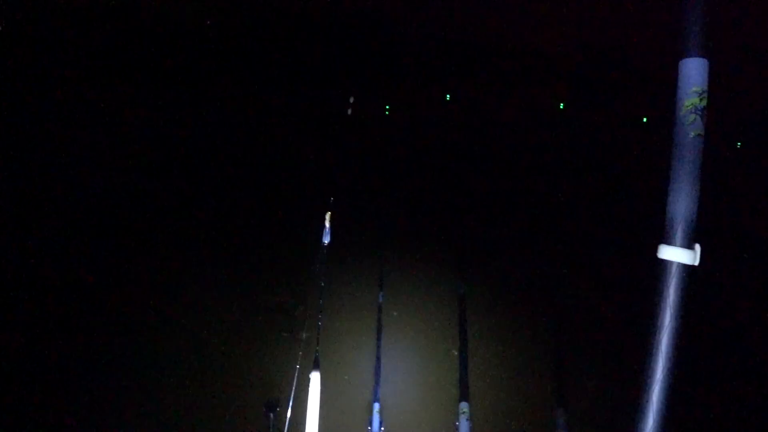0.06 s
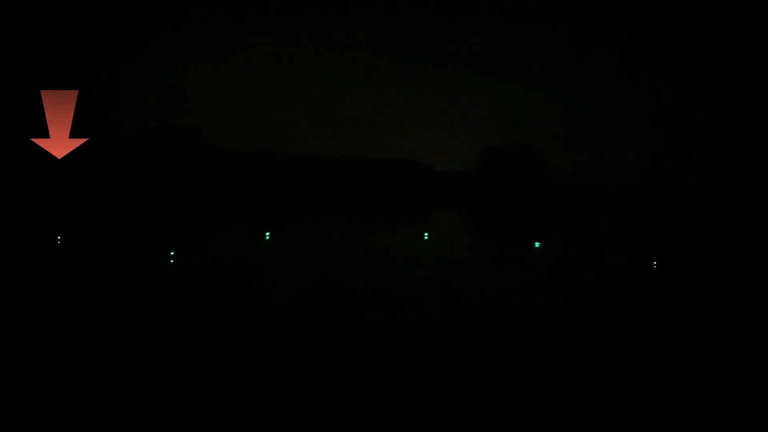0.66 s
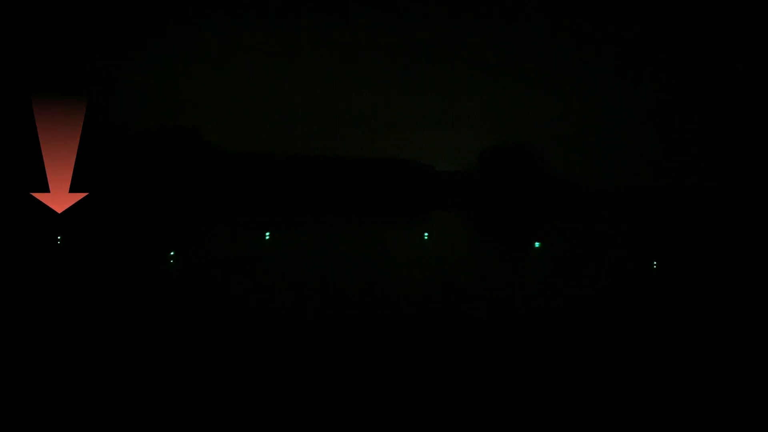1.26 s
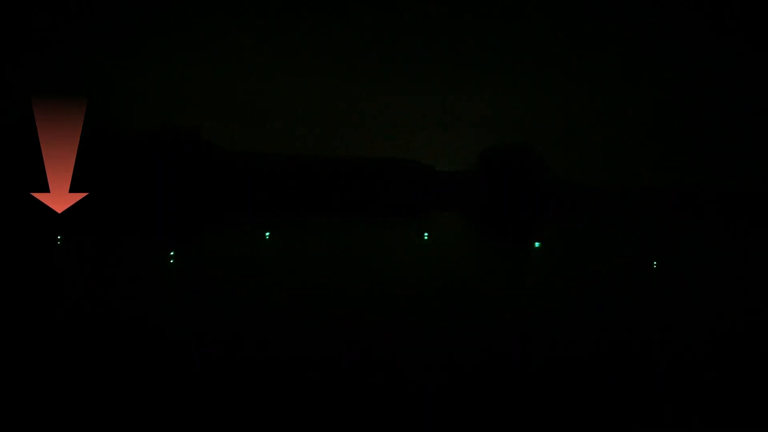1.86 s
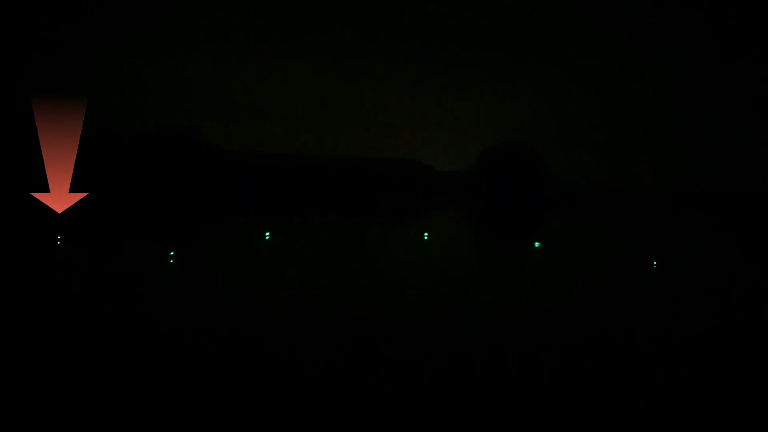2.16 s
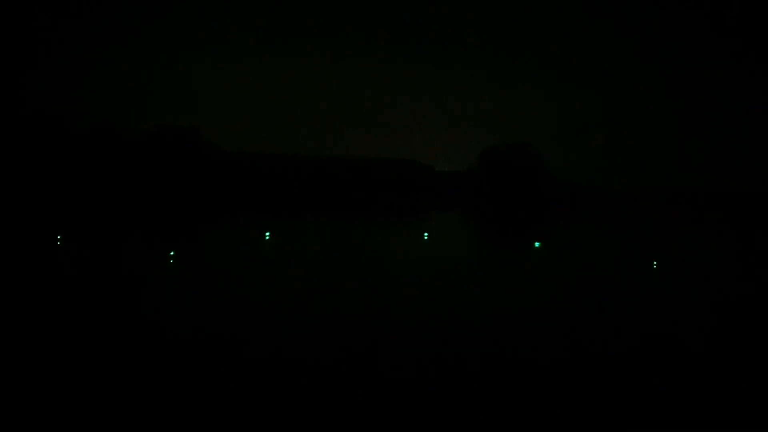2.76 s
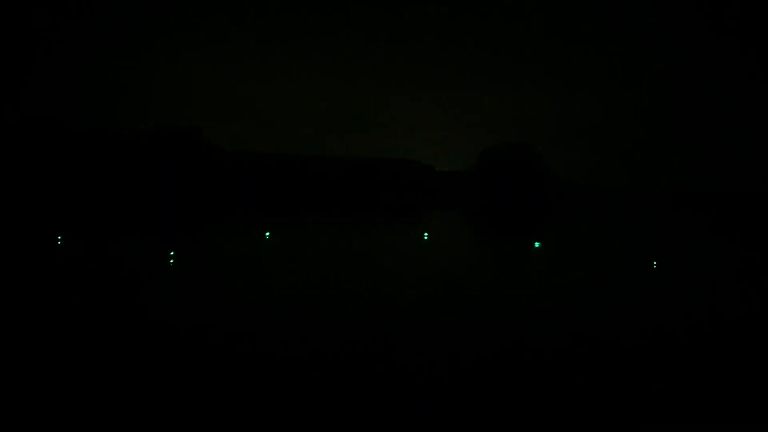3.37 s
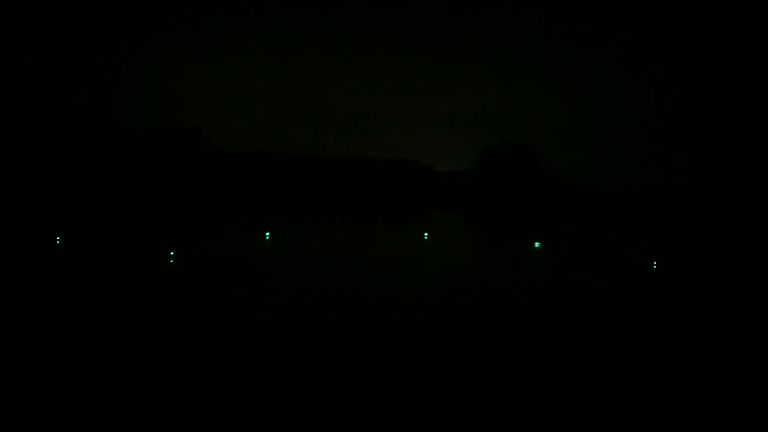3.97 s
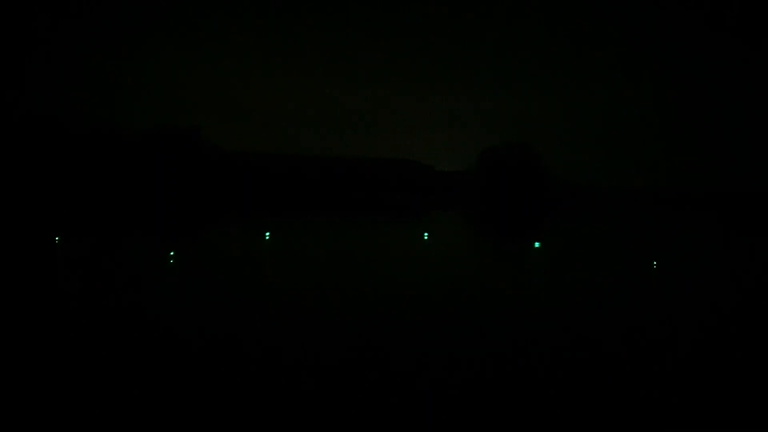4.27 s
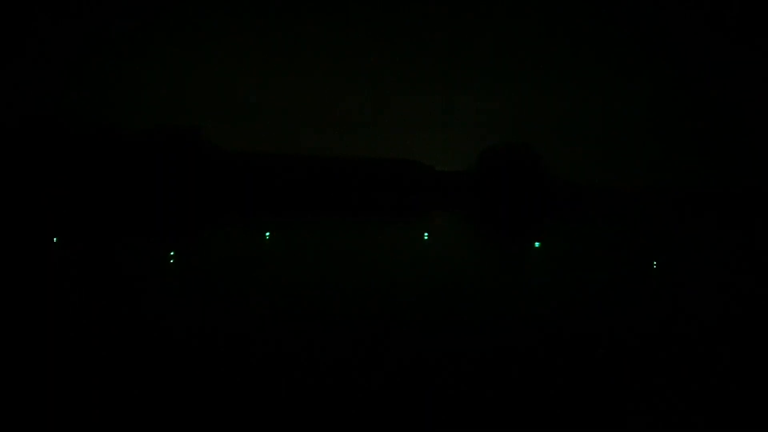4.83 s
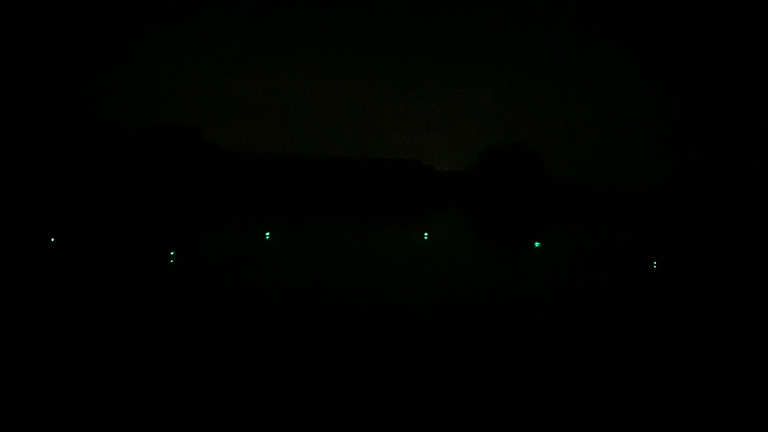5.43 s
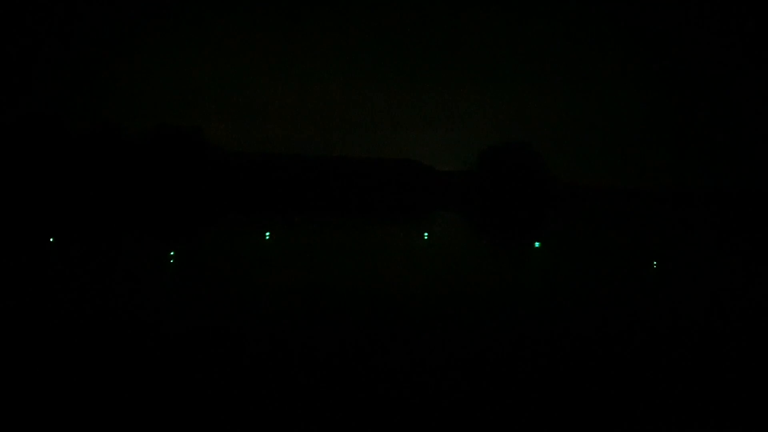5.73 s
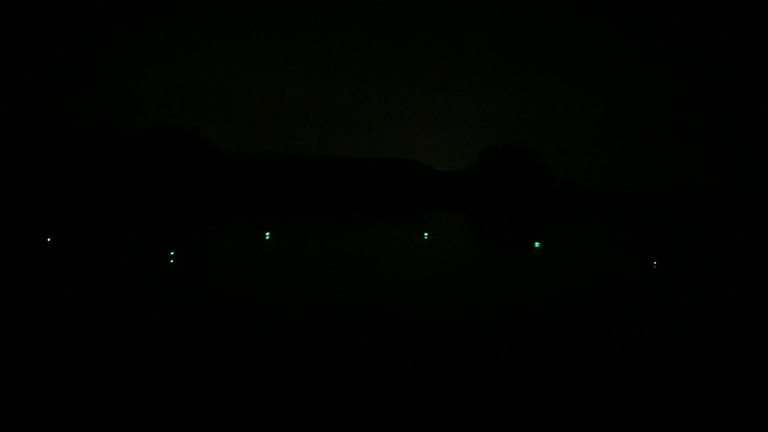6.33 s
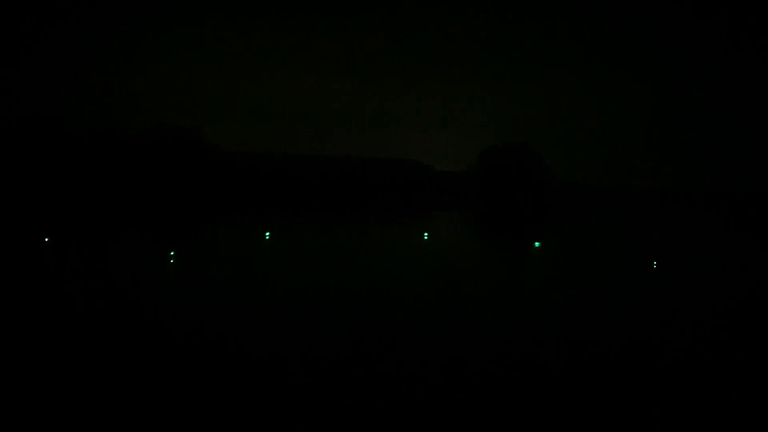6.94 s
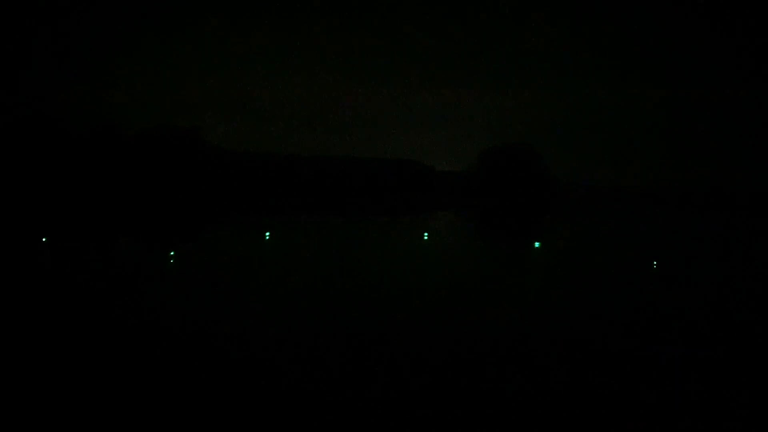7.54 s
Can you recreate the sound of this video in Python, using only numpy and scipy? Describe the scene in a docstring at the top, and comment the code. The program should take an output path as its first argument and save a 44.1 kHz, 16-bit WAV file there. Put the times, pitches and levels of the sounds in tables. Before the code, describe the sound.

A brief hiss gives way to a low, wavering wind rumble on the microphone beneath a night chorus of crickets beside open water. Close crickets pulse in repeated phrases on the left, with thin, fast insect ticking above and a few faint far chirps and soft rustles. Past the middle the wind strengthens and knocks against the microphone in deep thumps, one cracking sharply, as the crickets carry on.

```python
"""Crickets trill in chorus on a reservoir bank at night, by stridulation: each wing stroke scrapes a tone. The
nearest sing in swelling phrases, and a bush-cricket ticks high above them. A brief hiss fills the very start,
and at 0.135 s the sound changes abruptly: turbulent wind rumbles on the two microphone ports, grows, and
buffets them until the left one overloads. Far chirps and faint rustles come and go over the still night air."""
import sys
import numpy as np
from scipy import signal
from scipy.fft import rfft, irfft
from scipy.io import wavfile
from scipy.ndimage import uniform_filter1d

SR = 44100
rng = np.random.default_rng(int(sys.argv[2]) if len(sys.argv) > 2 else 0)


def wav_out(sig):
    """Save sig, one row per channel (or a flat mono array), as 16-bit PCM at SR to the path in sys.argv[1]."""
    wavfile.write(sys.argv[1], SR, np.round(np.clip(np.atleast_2d(sig).T, -1, 1) * 32767).astype(np.int16))


N = 335160
T = np.arange(N) / SR
FREQ = np.arange(N // 2 + 1) * SR / N + 1e-3


def chorus():
    """Incoherent summation: two kinds of cricket trill, and the furthest blur into band noise."""
    # spectra of the low and the high kind: frequency_hz, gain_db
    low_band = [(4300, -24), (4620, -15), (4810, 1), (4960, 1.5), (5140, -2), (5280, -10), (5420, -15),
                (5800, -37.5)]
    high_band = [(5000, -21), (5500, -6.5), (5900, 0), (6300, -0.5), (6600, -6), (6900, -10), (7100, -20),
                 (7600, -37)]
    # the low kind joins in for a moment: centre_s, half_length_s, lift_db
    surges = [(.63, 0.14, 6.5), (5.8, .2, 5), (6.7, 0.72, 2.5)]
    low = colour(swarm(4740, 5300, strokes_per_s=31, droop=.03, spread=.014, t60_s=.22, count=8), low_band)
    low = unit(low + .4 * colour(noise(), low_band))
    low *= undb(-56 + sum(swell(*row) for row in surges))
    high = swarm(5600, 6900, strokes_per_s=50, droop=.054, spread=.03, t60_s=.4, count=5)
    hush = colour(noise() * undb(1.2 * wander(110)), high_band)
    high = unit(colour(high, high_band) + 1.35 * hush)
    high *= undb(-56.5 + swell(centre_s=4, half_length_s=1.4, lift_db=-3))
    return from_left(low, right_db=-12) + from_left(high, right_db=-17)


def swarm(low_hz, high_hz, strokes_per_s, droop, spread, t60_s, count):
    """Superposition: crickets take turns at each pitch, so each stroke has its own tuning and strength."""
    song = 0
    for hz in np.linspace(low_hz, high_hz, count):
        beats = strokes_per_s * rng.uniform(.8, 1.2) * T + rng.random()
        k = beats.astype(int)
        progress = beats - k
        tuning, accent_db = rng.standard_normal((k[-1] + 1, 2)).T
        pitch_hz = hz * (1 - droop * (progress - .5) + spread * tuning[k])
        song += undb(accent_db)[k] * (progress * (1 - progress)) ** 2 * tone(pitch_hz)
    share = np.pi * wander(4)  # nearby grass and the far bank answer in shifting shares
    return scatter(song * np.cos(share), t60_s) + scatter(song * np.sin(share), t60_s)


def near_crickets(droop=.14, stroke_s=.025, lead_s=.012, rise_db_per_s=32, fade_db_per_s=21):
    """Stridulation: each wing closure scrapes a tone whose pitch sags as the wing slows."""
    # phrases: first_stroke_s, last_stroke_s, strokes_per_s, pitch_hz, crest_s, relative_level_db
    phrases = [(0.486, .79, 30.3, 5020, 0.69, -53), (1.719, 2.2, 32, 5220, 1.5, -48),
               (2.403, 2.732, 30.3, 4820, 2.68, -46.5), (2.872, 3.2, 29, 4850, 2.92, -48.5),
               (3.26, 3.677, 29, 5120, 3.45, -49), (3.762, 4.182, 29, 4850, 3.99, -50.5),
               (4.617, 4.946, 30.2, 4885, 4.93, -41.5), (5.091, 5.605, 31.2, 4876, 5.195, -39),
               (5.832, 6.28, 29.3, 4950, 5.88, -49), (6.509, 7.089, 30.5, 4915, 6.64, -43.5),
               (7.246, 7.57, 30.6, 4966, 7.4, -47.5)]
    song = np.zeros(N + SR)
    progress = T[:int(stroke_s * SR)] / stroke_s
    envelope = arch(progress, skew=.8) ** 1.5
    for first_s, last_s, rate, hz, crest_s, level_db in phrases:
        for k in range(round((last_s - first_s) * rate) + 1):
            late, sharp, strong = rng.standard_normal(3)
            time_s = first_s + k / rate
            drop_db = max(rise_db_per_s * (crest_s - time_s), fade_db_per_s * (time_s - crest_s))
            slowness = np.exp(-k / 1.2)  # the first strokes are slower, so flatter and weaker
            pitch_hz = hz * (1 - droop * progress ** 3.17) * (1 + .004 * sharp - .022 * slowness)
            gain = undb(level_db - .76 - drop_db + .6 * strong - 5.5 * slowness)
            start = int((time_s - lead_s + .0007 * late) * SR)
            song[start:start + len(progress)] += gain * envelope * tone(pitch_hz)
    song = song[:N] * undb(1.4 * wander(440))  # the teeth of the wing's file catch unevenly
    return from_left(song + undb(-9) * scatter(song, t60_s=.2), right_db=-12)


def bush_crickets(ticks_per_s=19.325, slowing_per_s2=.1685, first_tick_s=.0244):
    """Broadband stridulation: a rasp on each slowing wing beat, over the sizzle of others further off."""
    # loudness of the near insect: time_s, level_db
    tick_levels = [(.4, -58.5), (1, -63.5), (3.5, -60), (4, -58), (5.9, -57), (6.6, -59.5)]
    # spectra of the near rasp and the far sizzle: frequency_hz, gain_db
    tick_band = [(8000, -41.5), (11200, -18), (12600, -1), (14000, -1), (16000, 2.5)]
    sizzle_band = [(6000, -42.5), (8500, -33), (11000, -13.5), (12000, -5.5), (13300, 5), (15500, 6.5)]
    beats = ticks_per_s * (T - first_tick_s) - slowing_per_s2 * T ** 2 / 2
    offset = (beats + .5) % 1 - .5  # in beats from the nearest tick
    pulse = np.exp(-.5 * (offset / .06) ** 2)
    echo = .24 * (offset > 0) * np.exp(-np.abs(offset) / .2)
    rasp = colour(noise() * (pulse + echo) * undb(2 * wander(900)), tick_band)
    sizzle = colour(noise() * undb(1.5 * wander(150)), sizzle_band)
    flare_db = swell(centre_s=3.36, half_length_s=.2, lift_db=6)
    song = rasp * undb(curves(tick_levels)[0]) + sizzle * undb(-58.5 + flare_db)
    return from_left(song * undb(wander(6)), right_db=-17)


def wind():
    """Turbulence: rumble, hollow drone and whoosh rise with the gusts and waver together."""
    # base strength of the wind: time_s, rumble_db, whoosh_db
    strength = [(.14, -26, -50), (.6, -26.5, -48.5), (.76, -37.5, -57.5), (1.15, -36.5, -60),
                (1.35, -34, -53), (2.1, -38, -54.5), (2.8, -36.5, -52), (3.8, -39, -59),
                (4.38, -35.5, -47.5), (4.55, -29.5, -46.5), (4.95, -29.5, -46.5), (5.25, -24, -50.5),
                (5.55, -26.5, -48), (5.85, -18.5, -45.5), (6.1, -25, -50), (6.62, -28.5, -43.5),
                (6.9, -28.5, -48.5), (7.6, -29.5, -49)]
    # small, hollow-sounding gusts: centre_s, half_length_s, lift_db
    gusts = [(1.403, 0.13, 5), (2.377, 0.2, 4), (2.92, .2, 5.5), (3.465, .15, 9.5), (5.3, 0.27, 7.5),
             (6.255, 0.24, 5.5)]
    # side from which the wind strikes: time_s, left_minus_right_db
    lean = [(4.9, 0.5), (5.35, 1), (5.75, -2), (6.3, 7), (6.58, -4), (6.78, 5.5), (7.4, -3)]
    rumble_db, whoosh_db = curves(strength)
    gust_db = sum(swell(*row) for row in gusts)
    lean_db = curves(lean)[0] * np.array([[.5], [-.5]])
    above_breeze_db = rumble_db + 34.5
    lull_db = swell(centre_s=4.22, half_length_s=.51, lift_db=-8.5)
    flow = port_rumble() * undb(rumble_db + .23 * gust_db + lean_db)
    flow += hollow_drone() * undb(-51.5 + .15 * above_breeze_db + gust_db + lull_db)
    flow += whoosh() * undb(whoosh_db + 1 + .45 * gust_db)
    return flow * undb(1.16 * wander(7.8))


def port_rumble(evenness=.35):
    """Eddy shedding: a light breeze presses both ports alike; a rising one sheds separate eddies at each."""
    # spectra of the common pressure and of each port's eddies: frequency_hz, gain_db
    common_band = [(15, -28.5), (30, -19), (45, -4), (62, 2.5), (105, 3), (140, -8), (215, -13.5),
                   (290, -27), (400, -39.5), (800, -73), (2000, -73.5)]
    eddy_band = [(15, -36.5), (35, -5.5), (62, 4), (90, -2.5), (130, -10.5), (175, -11), (220, -21.5),
                 (400, -57.5), (900, -63.5), (2500, -72)]
    own = np.interp(T, [4.4, 5.3], [.35, .9])
    rumble = np.sqrt(1 - own ** 2) * colour(airflow(), common_band) + own * colour(noise(), eddy_band)
    # eddies follow each other closely, so the rumble seldom drops out
    power = uniform_filter1d(np.mean(rumble ** 2, axis=0), size=3500)
    return unit(rumble / power ** (evenness / 2))


def hollow_drone(centre_hz=255):
    """Narrowband noise: flow noise confined to one low band takes on a hollow pitch."""
    return unit(irfft(rfft(airflow()) * bell(FREQ, centre_hz, octaves=.27), N))


def whoosh():
    """Amplitude modulation: broad flow noise flutters at random."""
    # spectrum of the whoosh: frequency_hz, gain_db
    band = [(140, -3), (260, -1), (340, -5), (420, 1.5), (520, -5), (610, -6.5), (720, -16), (850, -28),
            (1200, -35), (1500, -29.5), (2200, -37), (5000, -48)]
    return from_left(colour(airflow() * undb(wander(45)), band), right_db=-3)


def airflow(coherent_below_hz=800, lag_s=.00029):
    """Spatial coherence: long waves reach both ports, the left one later; short waves are unrelated."""
    shared = rfft(noise(channels=1)) * np.exp(-2j * np.pi * FREQ * np.array([[lag_s], [0]]))
    own = (FREQ / coherent_below_hz) ** 2
    return irfft((shared + own * rfft(noise())) / np.hypot(1, own), N)


def buffets(half_length_cycles=.69):
    """Pressure pulses: each eddy sucks at the port between two weaker pushes."""
    # eddies striking the ports: centre_s, left_peak_db, right_peak_db, frequency_hz
    eddies = [(5.395, -23, -14, 64), (5.746, -37, -9, 100.4), (5.801, -39, -3, 60.4), (5.846, -31, -8, 82),
              (5.934, -20, -9, 89.4), (5.96, -5.5, -30, 71.3), (5.976, -29.5, -12.5, 87),
              (5.993, 3, -17, 78.7), (6.124, -6, -32, 82), (7.035, -3, -8, 74), (7.39, -36, -8, 86.6),
              (7.407, -37, -5.5, 68), (7.566, -38, -8.5, 73)]
    out = np.zeros((2, N))
    for centre_s, left_db, right_db, hz in eddies:
        near = np.abs(T - centre_s) < .1
        cycles = (T[near] - centre_s) * hz
        pulse = np.cos(2 * np.pi * cycles) * np.exp(-(cycles / half_length_cycles) ** 2)
        out[:, near] -= undb([[left_db], [right_db]]) * pulse
    return out


def far_chirps(length_s=.027, lead_s=.01, fall=.059):
    """Frequency modulation: pitch jitter makes short falling notes from across the water sound husky."""
    # distant notes: time_s, pitch_hz, relative_level_db
    notes = [(2.165, 3960, -71), (2.25, 3820, -55), (2.345, 3860, -58), (2.425, 3900, -62),
             (2.51, 3810, -62), (3.26, 3650, -59), (6.85, 3970, -59), (6.944, 3920, -54),
             (7.011, 3850, -55.5), (7.1, 3950, -57.5), (7.2, 3400, -54.5), (7.245, 3790, -55),
             (7.35, 3964, -60)]
    out = np.zeros(N)
    jitter = .046 * wander(600)
    for time_s, hz, level_db in notes:
        centre_s = time_s - lead_s
        near = np.abs(T - centre_s) < length_s / 2
        progress = (T[near] - centre_s) / length_s + .5
        pitch_hz = hz * (1 - fall * (progress - .5) + jitter[near])
        out[near] += undb(level_db - 1) * arch(progress) * tone(pitch_hz)
    return from_left(scatter(out, t60_s=.2), right_db=-11)


def rustles(rise_s=.022):
    """Band-limited bursts: grainy noise rises and decays exponentially into soft swishes."""
    # rustles on the bank: peak_s, level_db, centre_hz, width_octaves, decay_s
    swishes = [(2.225, -64.5, 2350, .27, .032), (6.645, -61, 13000, 0.36, .04),
               (6.785, -58.5, 13600, 0.34, 0.039), (6.909, -53.5, 2800, 1.25, .04)]
    out = np.zeros((2, N))
    grains = noise() * undb(4.4 * wander(300))
    for peak_s, level_db, centre_hz, octaves, decay_s in swishes:
        near = np.abs(T - peak_s) < .3
        t = T[near] - peak_s
        bins_hz = np.arange(len(t) // 2 + 1) * SR / len(t) + 1
        swish = unit(irfft(rfft(grains[:, near]) * bell(bins_hz, centre_hz, octaves), len(t)))
        out[:, near] += swish * undb(level_db) * np.exp(-np.maximum(-t / rise_s, t / decay_s))
    return from_left(out, right_db=-8)


def night_air(level_db=-65):
    """Ambient noise floor: a steady hush, unrelated at the two ports."""
    # spectrum of still night air: frequency_hz, gain_db
    band = [(30, -2), (300, 11.5), (900, 2.5), (1150, 1), (1450, 4.5), (1900, -2), (2350, -3), (2800, 2.5),
            (3150, -2.5), (3700, 1.5), (4500, 2.5), (6500, -6.5), (8000, -12), (11000, -3), (16000, -5.5)]
    return colour(noise(), band) * undb(level_db)


def opening_hiss(level_db=-54):
    """Broadband noise: a hiss that lacks the highest treble."""
    # spectrum of the hiss: frequency_hz, gain_db
    band = [(60, 0), (300, -5), (650, 1), (1400, 5.5), (1800, -4.5), (3000, -3), (4200, -7), (6200, 5.5),
            (7500, -10), (10800, -10), (11400, -45)]
    return colour(noise(), band) * undb(level_db)


def scatter(x, t60_s):
    """Diffuse reflection: grass and bank smear a sound, differently for each port."""
    t = T[:SR // 3]
    tail = noise()[:, :len(t)] * undb(-60 * t / t60_s)
    return signal.fftconvolve(np.atleast_2d(x), unit(tail) / np.sqrt(len(t)), axes=1)[:, :N]


def from_left(x, right_db):
    """Acoustic shadow: sound from the left is weaker at the right port."""
    return x * undb([[0], [right_db]])


def colour(x, points):
    """Spectral shaping by (frequency_hz, gain_db) points, at rms 1."""
    hz, db = np.transpose(points)
    return unit(irfft(rfft(x) * undb(np.interp(np.log(FREQ), np.log(hz), db)), N))


def bell(hz, centre_hz, octaves):
    """Band-pass gain, Gaussian in log frequency."""
    return np.exp(-.5 * (np.log2(hz / centre_hz) / octaves) ** 2)


def tone(pitch_hz):
    """A sine whose phase is the integral of its frequency."""
    return np.sin(2 * np.pi * np.cumsum(pitch_hz) / SR)


def arch(progress, skew=1.):
    """Half-sine envelope over progress from 0 to 1."""
    return np.abs(np.sin(np.pi * np.clip(progress, 0, 1) ** skew))


def swell(centre_s, half_length_s, lift_db):
    """A Gaussian rise or dip of level, in dB."""
    return lift_db * np.exp(-((T - centre_s) / half_length_s) ** 2)


def curves(table):
    """Linear interpolation of each column over the times in the first."""
    times_s, *columns = np.transpose(table)
    return [np.interp(T, times_s, column) for column in columns]


def wander(rate_hz):
    """Smooth random modulation, spread near 1."""
    hold = int(SR / rate_hz)
    steps = np.repeat(rng.standard_normal(N // hold + 2), hold)
    return 1.124 * uniform_filter1d(steps, hold)[rng.integers(hold):][:N]


def noise(channels=2):
    """Uncorrelated white noise for each channel."""
    return rng.standard_normal((channels, N))


def unit(x):
    """Scale to rms 1."""
    return x / np.sqrt(np.mean(x ** 2, axis=-1, keepdims=True))


def undb(db):
    """Decibels to amplitude gain."""
    return 10 ** (np.asarray(db) / 20)


def scene(onset_s=.135, crossfade_s=.0072):
    """Superposition of all sources; at 0.135 s the opening hiss is swapped abruptly for wind, bush-crickets and
    air."""
    onset = np.clip((T - onset_s) / crossfade_s + .5, 0, 1)
    air = night_air()
    hiss = (1 - onset) * opening_hiss()
    calls = near_crickets() + chorus() + far_chirps()
    return calls + rustles() + buffets() + onset * (wind() + bush_crickets() + air) + hiss


def record(dry, cutoff_hz=15750):
    """Hard clipping: the strongest buffet cracks at full scale; a steep low-pass cuts the top."""
    low_pass = signal.ellip(10, .1, 80, cutoff_hz, fs=SR, output="sos")
    return signal.sosfilt(low_pass, np.clip(dry, -1, 1))


dry = scene()
out = record(dry)
wav_out(out)
```